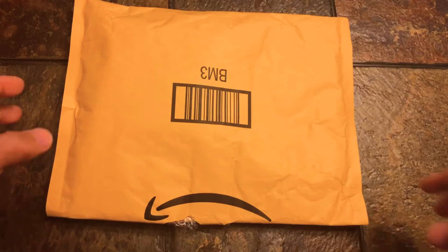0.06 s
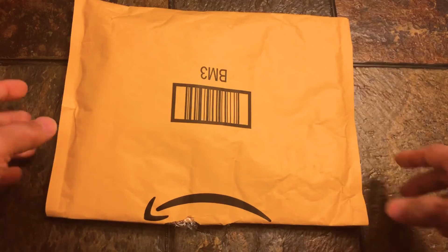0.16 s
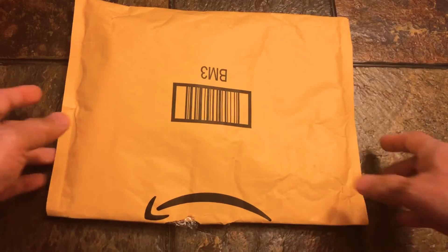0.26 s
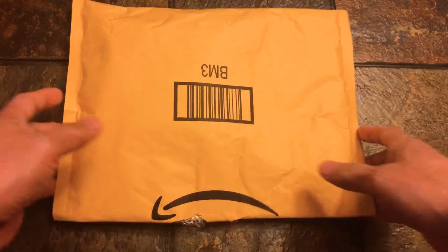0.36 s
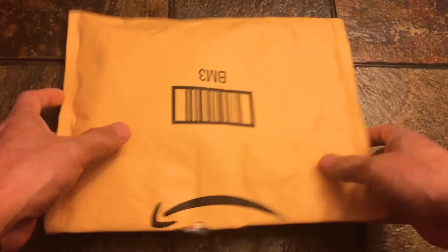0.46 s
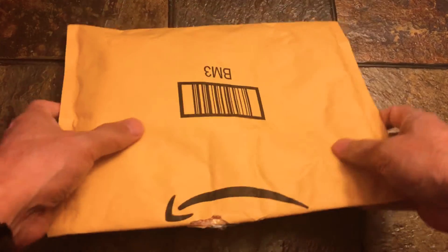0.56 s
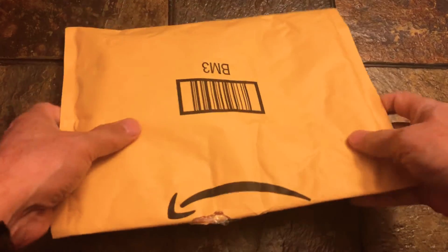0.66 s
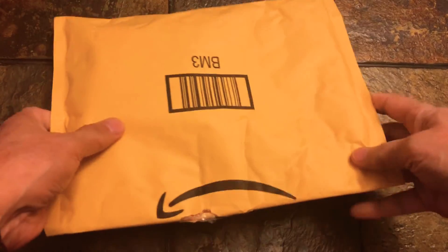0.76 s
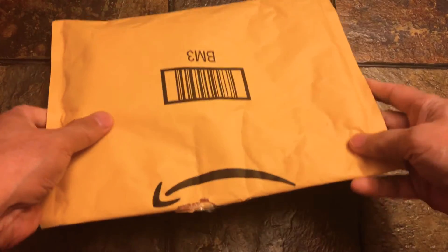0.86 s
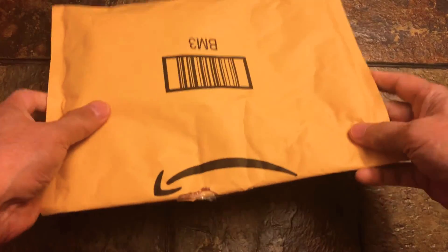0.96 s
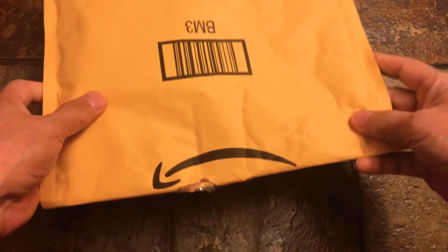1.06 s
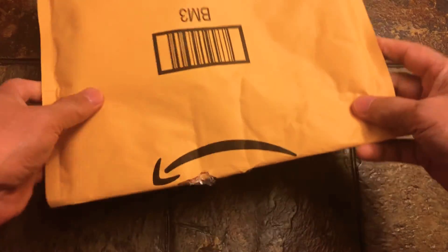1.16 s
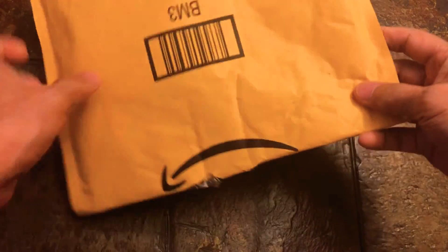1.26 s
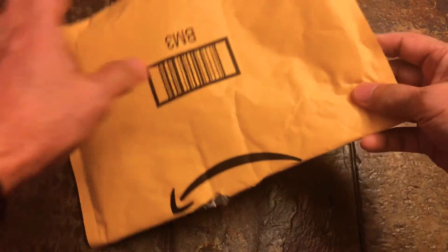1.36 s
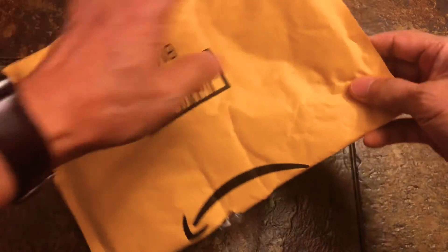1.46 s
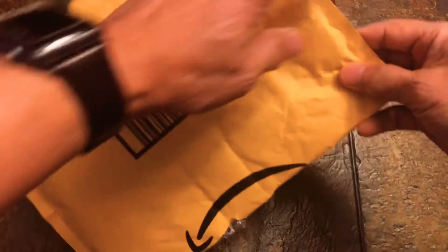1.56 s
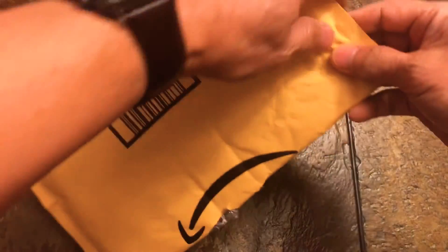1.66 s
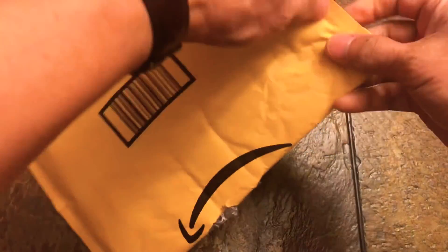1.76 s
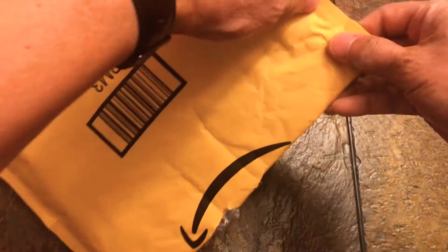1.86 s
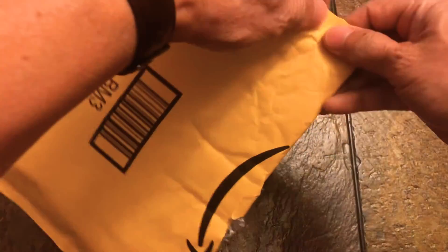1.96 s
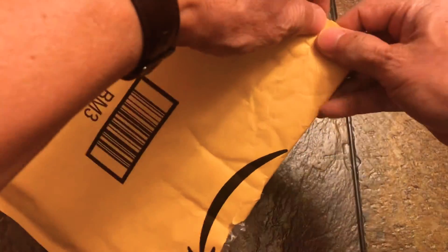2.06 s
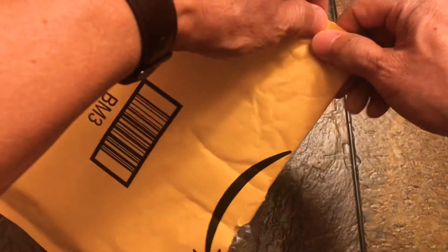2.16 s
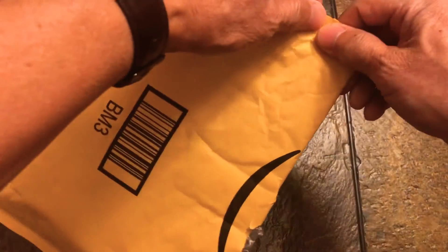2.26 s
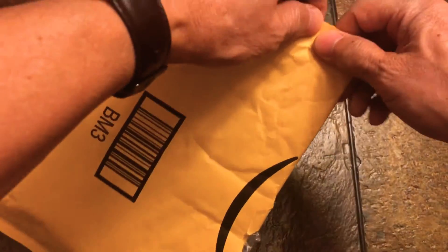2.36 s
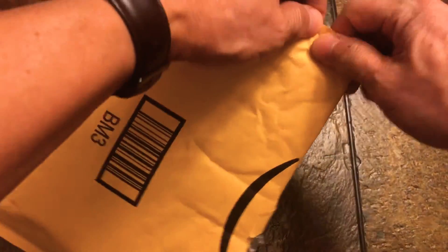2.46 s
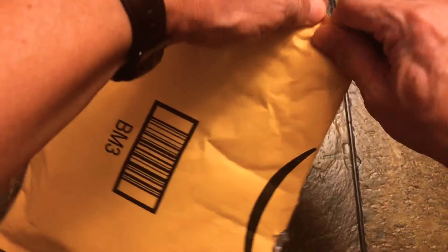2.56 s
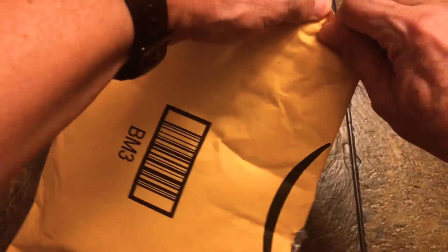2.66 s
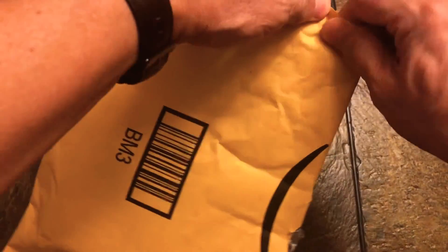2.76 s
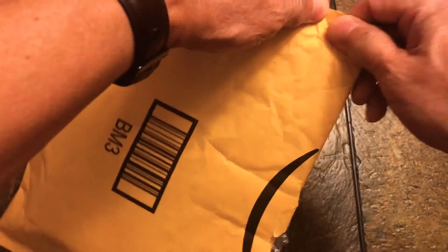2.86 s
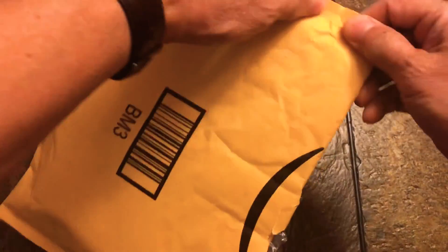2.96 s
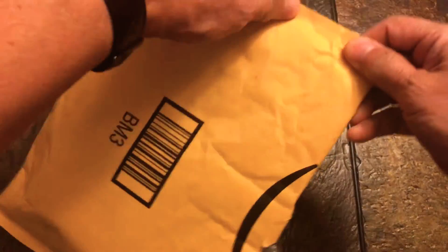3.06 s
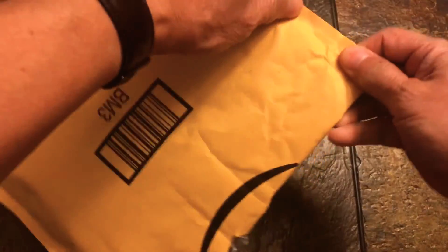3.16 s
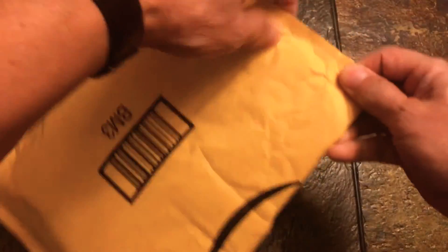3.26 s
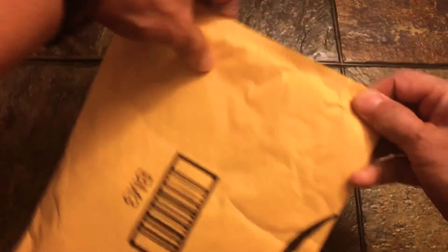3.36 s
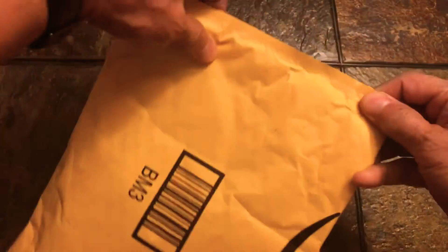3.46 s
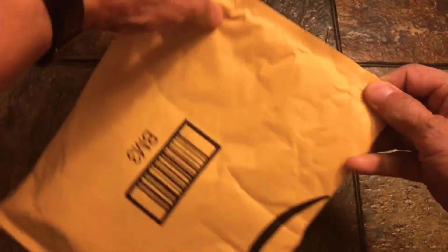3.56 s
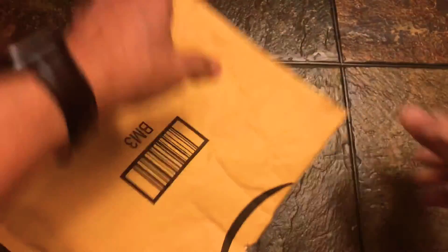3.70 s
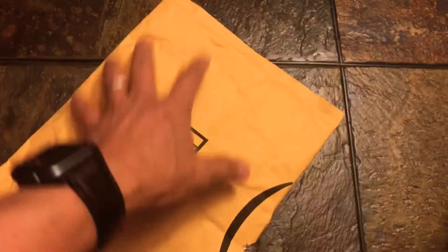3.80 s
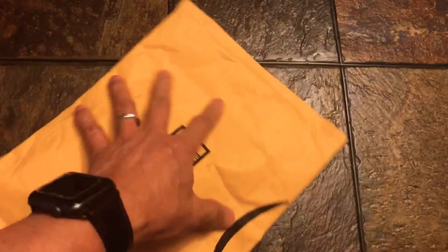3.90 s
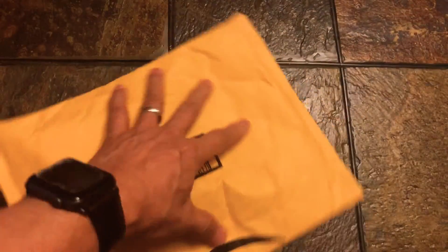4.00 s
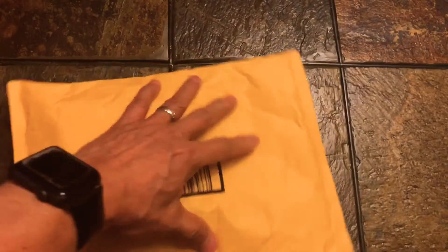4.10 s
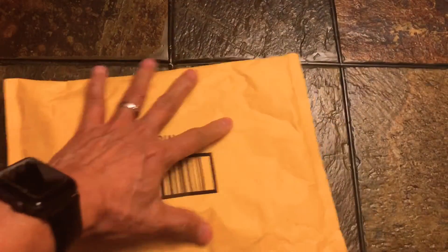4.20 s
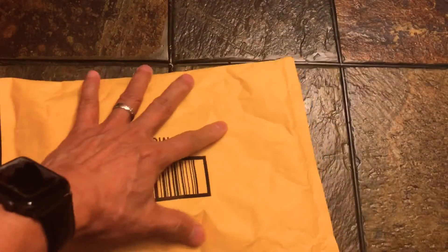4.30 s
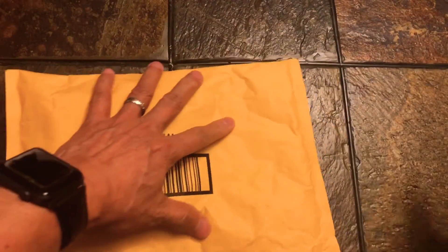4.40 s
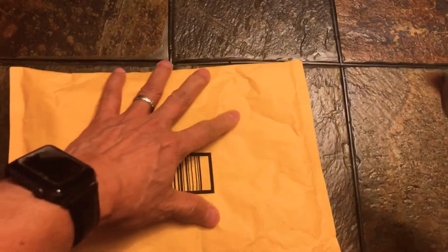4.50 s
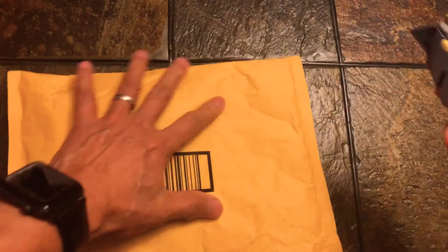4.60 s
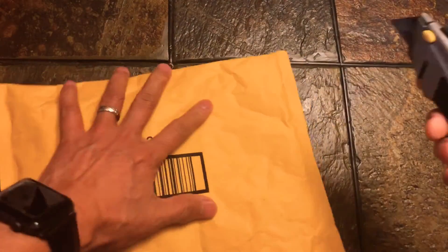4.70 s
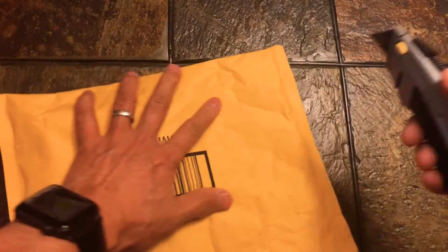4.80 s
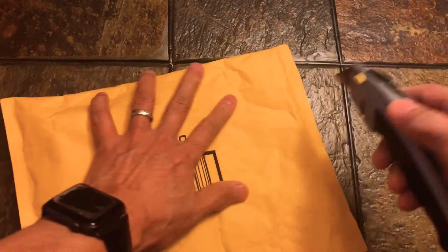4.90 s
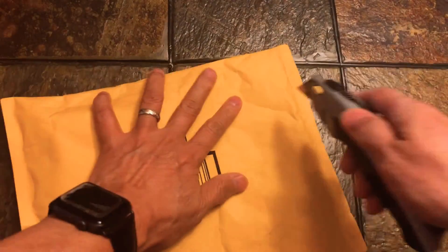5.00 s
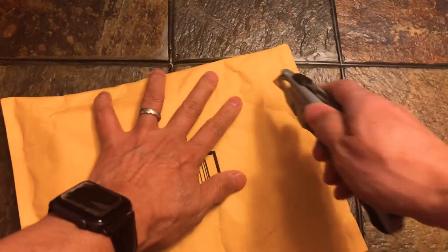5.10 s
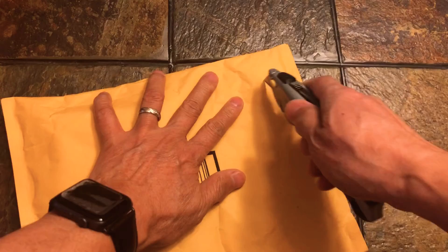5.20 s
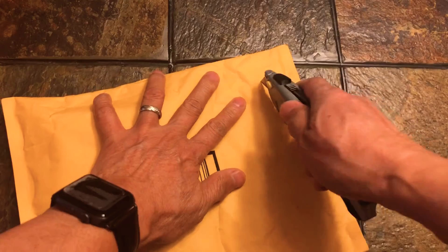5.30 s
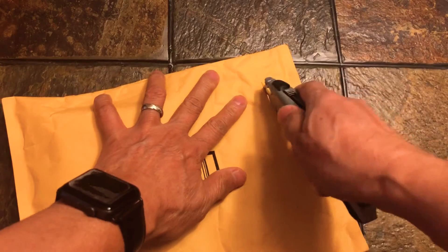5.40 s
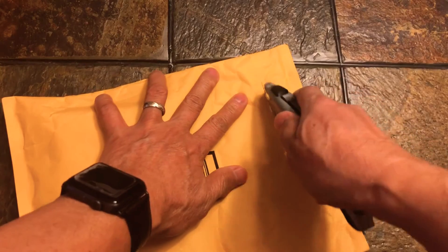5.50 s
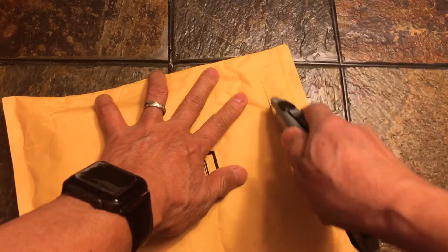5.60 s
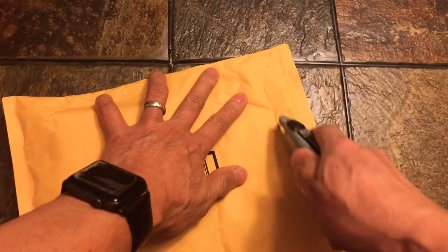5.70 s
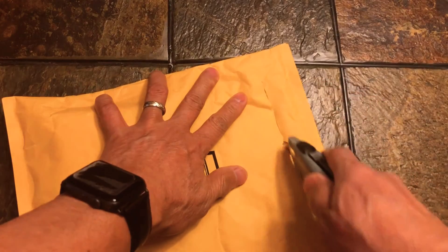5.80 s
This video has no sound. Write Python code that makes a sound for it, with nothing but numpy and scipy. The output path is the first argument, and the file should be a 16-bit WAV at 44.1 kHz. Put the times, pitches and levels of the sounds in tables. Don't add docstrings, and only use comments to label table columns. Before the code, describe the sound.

Very near the microphone in a small hard room, a padded paper envelope is gripped after a quiet start. It crinkles and crackles unevenly, with sharp crease snaps, rubbing skin and soft padding thuds as it is pulled and flattened on tiles. In the last half second a blade punches in loudly and saws, its coarse rasp breaking into quick tearing bursts.

```python
import sys
import numpy as np
from scipy import signal
from scipy.fft import rfft, irfft, next_fast_len
from scipy.io import wavfile
from scipy.ndimage import uniform_filter1d, map_coordinates

SR = 44100
rng = np.random.default_rng(int(sys.argv[2]) if len(sys.argv) > 2 else 0)


def generate_wav(signal):
    frames = np.transpose(np.atleast_2d(signal))
    scaled = np.clip(frames, -1, 1) * 32767
    pcm = np.round(scaled).astype(np.int16)
    wavfile.write(sys.argv[1], SR, pcm)


def decibels_to_gain(level_db):
    exponent = np.asarray(level_db, float) / 20
    return 10 ** exponent


N = 257984


def unit(x):
    return x / np.sqrt(np.mean(x ** 2) + 1e-20)


def along(points, hz):
    point_hz, value = np.transpose(points)
    return np.interp(np.log(hz + 1), np.log(point_hz + 1), value)


def filtered(x, response):
    size = next_fast_len(len(x) + 1280)
    hz = np.fft.rfftfreq(size, 1 / SR)
    return irfft(rfft(x, size) * response(hz), size)[:len(x)]


def resonances(*pairs):
    return lambda f: np.prod([1j * f * hz / q / (hz * hz - f * f + 1j * f * hz / q) for hz, q in pairs], axis=0)


def coloured(x, spectrum):
    closed = [(spectrum[0][0] / 2, -90)] + list(spectrum) + [(spectrum[-1][0] * 2, -90)]
    return unit(filtered(x, lambda hz: decibels_to_gain(along(closed, hz))))


def clumps(rate_hz, db):
    position = np.arange(N) * min(rate_hz, 400) / SR
    return decibels_to_gain(db * map_coordinates(rng.standard_normal(N // 100), [position]))


def spans(rows, smooth):
    t = np.arange(N) / SR
    steps = sum(value * ((t > start_s) & (t < end_s)) for start_s, end_s, value in rows)
    return uniform_filter1d(steps, size=smooth)


def add_at(out, start, wave):
    out[start:][:len(wave)] += wave


# hz, density_db (per Hz)
QUIET = [(30, -27), (71, -9.5), (140, -1), (300, -4), (450, -6.5), (700, -10.5), (4040, -30), (15500, -27)]


def hush():
    return decibels_to_gain(-66.5) * coloured(rng.standard_normal(N), QUIET)


# peak_s, crackle_db, fade_s (per 10 dB), rub_db, weight_db (both over crackle)
SUDDEN = [
    (0.398, -46.5, 0.46, -10, -0.5),
    (0.533, -42, 0.22, 0.5, -2),
    (1.27, -44, 0.24, 0, 0),
    (1.697, -56, 1.4, -3, -3),
    (3.339, -46.5, 0.15, 2, -9),
    (3.922, -40, 0.33, -2.5, 2.5),
    (5.303, -42.5, 0.22, -4.5, 2.5),
    (5.462, -35.5, 0.08, -4, 6.5),
          (.004, -54, 0.074, -12, -2.5),
    (.05, -65.5, 0.24, -13, -2),
    (5.465, -32, 0.006, -7, 2),
]
TUGS = [(.62, -43.5, 0.088, -21, 6), (.836, -45, 0.087, 0, -2.5), (.94, -47.5, 0.27, -5.5, -3),
        (1.07, -49.5, 0.035, -8, -20), (1.23, -50.5, .1, -7, -1.5), (1.481, -45, 0.24, -3, 0.5),
        (1.635, -51, 0.038, -10, 0.5), (1.73, -52, 0.046, 5.5, -3), (1.845, -43, 0.2, -0.5, -0.5),
        (2.07, -46, 0.074, -1, 2.5), (2.215, -53, 0.97, -1.5, -6), (2.601, -45.5, 0.34, -1.5, -4.5),
        (2.72, -55, 0.051, 1, 4), (2.9, -47.5, 0.28, -4.5, -17), (3.0, -48.5, 0.49, -0.5, 1),
        (3.12, -49, 0.15, 4, -4), (3.29, -59.5, 0.025, -7, 10.5), (3.39, -42.5, 0.1, 1, -1),
        (3.45, -38.5, 0.094, 1, 2.5)]
PRESSES = [(3.652, -43, 0.14, -3, -9), (3.708, -43.5, 0.033, 4.5, 9), (3.83, -49.5, 0.16, -5.5, 2.5),
           (4.15, -45, 0.23, -0.5, 1), (4.3, -50.5, 0.084, -2, 2), (4.515, -44, 0.35, -3, 0),
           (4.78, -52.5, 0.71, -3, 3), (4.909, -43.5, 0.072, 0, -1), (5.01, -50, 0.089, 1, 11),
           (5.11, -52.5, 0.13, 0.5, 6), (5.41, -52, .1, -3, -5)]
SAWING = [
    (5.61, -36.5, 0.19, -2.5, -8.5),
    (5.7, -37, 0.04, -3, -5),
    (5.767, -33.5, 0.1, -4.5, -12),
    (5.85, -30, .1, -6.5, -14.5),
]
# time_s, push_db (over sheet)
LOAD = [(0, -2.5), (.6, -10), (1.5, -6), (1.68, 1), (2.2, -13), (2.45, -10), (2.62, -6), (2.95, -3.5),
        (3.4, -0.5), (3.65, -7.5), (3.82, 2.5), (3.95, -5), (4.2, -10), (4.5, -14.5), (5.4, -12.5),
        (5.75, -0.5)]
SUDDEN_RISE_S, STROKE_RISE_S = 0.007, 0.073
RUB_SWING, SHEET_SWING, PUSH_SWING = 1.4, 1.37, 1


def effort():
    t, power = np.arange(0, N, 32) / SR, 0
    strokes = [(SUDDEN_RISE_S, *row) for row in SUDDEN]
    strokes += [(STROKE_RISE_S, *row) for row in TUGS + PRESSES + SAWING]
    for rise_s, peak_s, db, fade_s, rub_db, weight_db in strokes:
        drop_db = 10 * np.where(t < peak_s, (peak_s - t) / rise_s, (t - peak_s) / fade_s)
        push_db = weight_db + np.interp(peak_s, *np.transpose(LOAD))
        peak_db = db + np.array([0, rub_db, weight_db, push_db])[:, None]
        power = power + decibels_to_gain(peak_db - np.outer([1, RUB_SWING, SHEET_SWING, PUSH_SWING], drop_db)) ** 2
    return [np.interp(np.arange(N) / SR, t, np.sqrt(p)) for p in power]


def grains(count, hz, octaves, cycles, spread_db):
    u, t = rng.random((count, 4)), np.arange(320)[None] / SR
    pitch_hz = np.clip(hz * 2 ** (octaves * (u[:, 1:2] + u[:, 2:3] - 1)), 100, SR / 2.5)
    size = decibels_to_gain(-spread_db * np.log(u[:, 3:] + 0.014))
    wave = size * np.sin(2 * np.pi * pitch_hz * t) * np.exp(-t * pitch_hz / cycles)
    at = (u[:, :1] * N).astype(int) + np.arange(320)
    return unit(np.bincount(at.ravel(), wave.ravel(), minlength=N)[:N])


def bed(spectrum, spikes, share, gain, patchy_db):
    share = np.clip(share, 0, 1)
    mix = np.sqrt(1 - share) * rng.standard_normal(N) + np.sqrt(share) * spikes
    z = signal.stft(mix * gain, nperseg=512)[2]
    field = uniform_filter1d(rng.standard_normal(z.shape), size=5, axis=0)
    field = uniform_filter1d(field, size=8, axis=1)
    patchy = signal.istft(z * decibels_to_gain(patchy_db * unit(field)), nperseg=512)[1][:N]
    return coloured(patchy, spectrum)


# hz, density_db (per Hz)
CRACKLE = [(1200, -5.5), (2200, -6), (3300, 0), (5000, 0), (8000, -6.5)]
# hz, density_db (per Hz)
RUB = [(3000, -17), (6000, 0), (8500, -1.5), (11000, -5), (15500, -6.5)]
# hz, density_db (per Hz)
SHEET = [(500, 1), (760, -2), (920, -1.5), (1150, -4), (1600, 2.5), (2000, 0), (3200, -20)]
# hz, density_db (per Hz)
PUSH = [(25, -30), (50, 0.5), (85, -2), (190, -4.5), (400, 2), (600, -3), (1000, 7)]
# hz, density_db (per Hz)
RASP = [(900, -26), (1600, 3), (2300, 4), (3300, 3), (4800, 6), (6000, -13), (8500, -1)]
# start_s, end_s, rub_db
LULLS = [
    (1.138, 1.198, -3.5),
    (1.66, 1.688, -9),
    (2.39, 2.51, -5.5),
    (2.8, 2.85, -8),
    (3.285, 3.335, -3),
    (3.745, 3.81, -0.5),
    (3.85, 3.912, -2),
    (4.35, 4.42, -2.5),
    (5.23, 5.272, -4),
]
BLADE_S = 5.456


def handling():
    crackle, rub, sheet, push = effort()
    lull_db = spans(LULLS, smooth=200)
    crackle, rub = crackle * decibels_to_gain(0.56 * lull_db), rub * decibels_to_gain(lull_db)
    fine = grains(count=7000, hz=3170, octaves=1.39, cycles=1.6, spread_db=-1.5)
    flex = grains(count=2500, hz=1320, octaves=1.0, cycles=3.0, spread_db=4.0)
    coarse = grains(count=700, hz=299, octaves=1.55, cycles=2.0, spread_db=2)
    tips = grains(count=9000, hz=9800, octaves=0.53, cycles=1.0, spread_db=2.0)
    fibres = grains(count=12000, hz=2560, octaves=1.2, cycles=2.6, spread_db=4.0)
    wrinkles = grains(count=900, hz=2800, octaves=1.6, cycles=1.4, spread_db=5)
    pricks = grains(count=600, hz=5500, octaves=1, cycles=.6, spread_db=5)
    tremor = clumps(60, db=.9) * clumps(170, db=1.3)
    rasp = decibels_to_gain(1.5) * bed(RASP, fibres, 0.87, tremor * clumps(220, db=1.0), patchy_db=4.5)
    paper = decibels_to_gain(-0.24) * bed(CRACKLE, fine, 0.27, tremor, patchy_db=0.5)
    paper = paper + decibels_to_gain(-11) * wrinkles + decibels_to_gain(-8) * pricks
    skin = decibels_to_gain(1.0) * bed(RUB, tips, 0.24, tremor, patchy_db=1.0)
    flexing = bed(SHEET, flex, 0.29, tremor, patchy_db=3.5)
    padding = decibels_to_gain(-1.0) * bed(PUSH, coarse, 0.034, np.sqrt(tremor), patchy_db=0.5)
    surface = np.where(np.arange(N) / SR > BLADE_S, rasp, paper)
    return crackle * surface + rub * skin + sheet * flexing + push * padding


LEAD = 128
SPREAD = .023
KNOCK_DB, KNOCK_GROWS, KNOCK_DB_PER_OCTAVE = -27, 0.59, -4.5


def snap(db, hz, edge_db, knock_db):
    t = np.arange(768) / SR
    scatter = np.clip(rng.standard_normal(len(t)) ** 3 / 4, -1.6, 1.6)
    jerk = decibels_to_gain(-19.0 - 60 * t / 0.013) * scatter
    jerk[0] = np.clip(0.97 + db / 35, .25, 1)

    def dispersion(f):
        return np.exp(-2j * np.pi * (SPREAD * (2 * np.sqrt(f) - f / np.sqrt(hz)) + f * LEAD / SR))

    def body_response(f):
        damping = 1 / (1 - (f / hz / 2.4) ** 2 + .5j * f / hz)
        return damping * resonances((hz * 1.2, .8), (hz * 0.92, .55), (hz * 0.95, .9))(f)

    jerk = filtered(jerk, dispersion)
    body = filtered(jerk, body_response)
    edge = filtered(jerk, resonances((6800 * 2 ** (edge_db / 30), .9), (4200, .6)))
    knock = filtered(jerk, resonances((560, 1.2), (420, .9), (500, .6)))
    parts = [(body, 0), (edge, edge_db), (knock, knock_db)]
    return sum(decibels_to_gain(db + part_db - 0.5) * p / np.abs(p).max() for p, part_db in parts)


# start_s, peak_db, pitch_hz, edge_db (over body)
LIFTING = [(0.529, -21, 6030, -34), (0.5293, -15.5, 2000, -32), (0.6269, -17.5, 1670, -4),
           (0.647, -21.5, 1770, -0.5), (0.786, -19, 1730, -12), (0.8187, -20, 2640, -4.5),
           (0.8198, -20, 5200, -12), (0.8209, -13, 1840, -33), (0.8596, -24.5, 1560, -4),
           (0.9637, -19, 1560, -29), (1.409, -27, 1290, 4), (1.4327, -15, 1590, -5.5),
           (1.468, -0.5, 2660, -17), (1.8382, -20.5, 4950, -9), (1.908, -23, 1620, -22),
           (1.9301, -27, 394, -25), (2.0633, -20.5, 1750, -15), (2.178, -25.5, 2220, -20),
           (2.1972, -1.7, 3740, -7), (2.1966, -2.5, 5500, -18), (2.201, -9.5, 5560, -15),
           (2.2001, -16, 2140, -30)]
PULLING = [(2.548, -21.5, 1420, -21), (2.554, -18.5, 3700, -32), (2.5808, -9.5, 3520, -33),
           (2.5817, -14, 2290, -35), (2.609, -24, 1400, 5), (2.6168, -22, 1390, -27),
           (2.646, -24.5, 5050, -17), (2.6609, -20.5, 1530, -4), (2.702, -19, 3220, -5),
           (2.7914, -19.5, 1750, -42), (2.856, -32, 1740, -19), (2.9428, -20, 1600, -16),
           (2.9678, -3.5, 3220, -21), (3.1217, -16, 1960, 7.5), (3.275, -19.5, 2530, 0.5),
           (3.3825, -14, 1740, -4), (3.4008, -15.5, 3980, -11), (3.499, -17, 1970, -8),
           (3.533, -21.5, 1610, -8)]
FLATTENING = [(3.6574, -18, 4040, -11), (3.719, -17, 1260, -2), (3.7217, -16, 3160, -4),
              (3.8258, -29.5, 1540, 10), (3.83, -21, 1050, -9), (3.915, -23, 1390, -15),
              (3.9358, -12.5, 3400, -7), (3.949, -12, 2250, -2), (3.959, -15, 1164, -3),
              (4.023, -25, 1210, -21), (4.101, -27.5, 1240, -17), (4.2593, -20.5, 4600, 5.5),
              (4.3116, -11, 1410, -15.5), (4.3202, -16, 1320, -11), (4.516, -21.5, 835, -1),
              (4.55, -23, 1580, -17), (4.553, -30, 1000, 2), (4.601, -13, 2500, 4.5),
              (4.6034, -21, 980, -30), (4.6203, -23.5, 1750, -22), (4.7378, -20.5, 1410, -32),
              (4.787, -19, 1320, -10), (4.8072, -24, 1340, -22), (4.904, -21, 1360, -24),
              (4.926, -27, 3000, -12), (4.987, -13, 1090, -3.5), (5.0482, -6.5, 2000, -6.5),
              (5.0505, -16.5, 1220, -29), (5.085, -19.5, 2830, -28), (5.1289, -15.5, 980, -17)]
CUTTING = [(5.2753, -17, 1230, -43), (5.2805, -18, 1200, -0.5), (5.3177, -16.5, 1930, -30),
           (5.3311, -12, 2040, -4.5), (5.4125, -16, 1750, -11), (5.4553, -8, 1680, -37),
           (5.4557, -1, 3740, -26), (5.456, -1, 1310, -20), (5.4582, -10.5, 2080, -3),
           (5.4661, -7.5, 3240, -3), (5.532, -5.5, 2100, -2.5), (5.535, -24, 1840, -15),
           (5.547, -9.5, 3470, -31), (5.5964, -2, 3060, 1.5), (5.616, -18, 2270, -12),
           (5.6589, -10.5, 2970, -2.5), (5.6774, -20, 2600, 0), (5.7454, -25, 2280, 8),
           (5.826, -14, 2420, 0), (5.8335, -19, 2200, -3)]
# start_s, peak_db, pitch_hz
TICKS = [(0.403, -29, 960), (0.778, -28, 750), (0.939, -29.5, 694), (1.052, -38, 880),
         (1.09, -35, 675), (1.2777, -24.5, 1800), (1.45, -27, 1320), (1.647, -30.5, 935),
         (1.7214, -24.5, 1270), (1.7273, -27, 1490), (1.871, -22.5, 970), (1.9705, -31, 660),
         (2.104, -27.5, 1740), (2.287, -34, 1520), (2.6944, -24, 1300), (2.808, -30.5, 674),
         (2.995, -29, 1480), (3.113, -29, 820), (3.2064, -24.5, 1410), (3.2513, -31, 1680),
         (3.5098, -18, 1370), (3.599, -28, 1340), (4.24, -25, 1660), (4.648, -34, 1840),
         (4.8877, -24, 990), (4.959, -26, 1360), (4.9946, -22, 1390), (5.1137, -26, 1390),
         (5.707, -35, 990),
         (.159, -57, 7000), (0.302, -51.5, 3870), (0.421, -46, 4260), (0.445, -25.5, 3850),
                (0.465, -27, 5860), (0.4906, -23.5, 3980), (.6065, -16, 8270), (0.711, -26, 6700),
                (0.852, -28, 3340), (1.2726, -28.5, 3100), (1.2937, -31, 8650), (1.8678, -27, 6940),
                (1.8835, -27, 4520), (2.1877, -19, 8140), (2.2128, -35, 7040), (2.385, -33, 7990),
                (2.5134, -34, 7900), (2.72, -25, 6650), (3.224, -24, 3450), (3.418, -21, 2930),
                (3.449, -16, 6750), (3.454, -21, 2820), (4.236, -27, 3810), (4.4298, -29.5, 4630),
                (4.8292, -32, 8760), (5.136, -29.5, 6360), (5.206, -33, 7300), (5.484, -20, 5870),
                (5.488, -18, 5850), (5.5243, -25, 8480),
         (.733, -41, 3170), (.9928, -40, 3610), (1.0315, -33, 6000), (1.066, -42, 8000),
               (1.089, -35, 6000), (1.105, -42.5, 2190), (1.124, -42, 7000), (1.133, -43, 7080),
               (1.2163, -47, 4300), (1.527, -43, 11000), (1.655, -31.5, 3230), (1.781, -42, 7950),
               (1.9273, -29, 4000), (1.9356, -25.5, 3400), (2.027, -38, 2500), (2.055, -28, 5000),
               (2.675, -27, 7000), (2.711, -25, 11100), (2.545, -31, 6500), (2.766, -36, 8940),
               (2.782, -43, 10000), (2.815, -41, 6460), (2.95, -31, 7000), (3.007, -44, 10000),
               (4.209, -28.5, 2500), (4.471, -29, 10000), (4.821, -31, 780), (5.195, -58, 9150),
               (5.2245, -39, 5140), (5.268, -40, 5000), (5.321, -35, 10100)]


def snaps():
    out = np.zeros(N + SR)
    events = [(*row, True) for row in LIFTING + PULLING + FLATTENING + CUTTING]
    events += [(*row, -40, row[2] < 2000) for row in TICKS]
    for start_s, db, hz, edge_db, knocks in events:
        knock_db = -40
        if knocks:
            knock_db = KNOCK_DB + (KNOCK_GROWS - 1) * db + KNOCK_DB_PER_OCTAVE * np.log2(hz / 2000)
        add_at(out, round(start_s * SR) - LEAD, snap(db, hz, edge_db, knock_db))
    return out[:N]


# hz, t60_s
ROOM = [(200, 0.97), (2000, 0.9), (10000, 0.13)]


def room(x):
    hz, t, z = signal.stft(rng.standard_normal(SR // 2), SR, nperseg=256)
    tail = signal.istft(z * decibels_to_gain(-60 * t / along(ROOM, hz)[:, None]), SR, nperseg=256)[1]
    delayed = np.pad(x, (200, 0))
    return signal.fftconvolve(delayed, tail / np.linalg.norm(tail))[:N]


# start_s, level_db, pitch_hz, t60_ms
RINGS = [
    (.5289, -4, 5050, 5.5),
    (0.5277, -10.5, 6700, 6.5),
    (2.1976, -20, 3420, 23),
    (2.5808, -14, 5620, 7.5),
    (2.5819, -15.5, 3550, 10),
]


def rings():
    out, t = np.zeros(N + SR), np.arange(768) / SR
    rise = 1 - np.exp(-t / 0.00029)
    for start_s, db, hz, t60_ms in RINGS:
        decay = decibels_to_gain(db - 60 * t / (t60_ms / 1000))
        add_at(out, round(start_s * SR), decay * rise * np.sin(2 * np.pi * hz * t))
    return out[:N]


# start_s, peak_db, pitch_hz
THUDS = [(1.65, -38, 257), (1.94, -46, 160), (1.875, -44, 440), (0.6, -29.5, 410), (2.088, -41.5, 210),
         (2.551, -46, 185), (2.596, -31.5, 410), (2.599, -37, 180), (2.613, -32, 170), (2.624, -37, 100),
         (3.291, -35.5, 68), (1.302, -31.5, 680), (0.55, -43, 190), (5.2, -34, 190), (3.732, -32.5, 69),
         (3.823, -31, 170), (3.94, -29.5, 460), (3.984, -30.5, 210), (4.124, -36, 206), (4.33, -42, 196),
         (4.505, -36.5, 220), (5.457, -28, 420), (5.74, -38, 270), (5.747, -32.5, 274), (5.76, -28.5, 210),
         (3.213, -31.5, 490), (3.44, -33.5, 280)]
SAG_PER_S = 3


def thuds():
    out, t = np.zeros(N + SR), np.arange(SR // 8) / SR
    swell = t / 0.0078 * np.exp(1 - t / 0.0071)
    for start_s, db, hz in THUDS:
        lump = unit(filtered(rng.standard_normal(len(t)), resonances((hz, .9), (hz, .7))))
        push = .55 * np.sin(2 * np.pi * hz * t * (1 - SAG_PER_S * t))
        add_at(out, round(start_s * SR), decibels_to_gain(db - 6.5) * swell * (push + lump))
    return out[:N]


# peak_s, peak_db, pitch_hz, length_ms
CRUMBLES = [(0.553, -28, 1600, 14), (.5805, -29.5, 920, 3.8), (0.599, -17.5, 3900, 3.2),
            (.625, -30, 2620, 4.5), (1.633, -32, 1440, 6), (1.828, -32.5, 1270, 4.1),
            (1.842, -33, 1210, 4.3), (1.884, -29, 1100, 2.5), (2.09, -33.5, 4500, 9.5),
            (2.588, -24, 1180, 2.1), (2.6955, -33.5, 513, 6.6), (3.179, -35, 1350, 4.4),
            (3.229, -27.5, 1460, 3.4), (3.258, -33, 1670, 4.2), (3.275, -21, 1690, 3.4),
            (3.311, -34, 1490, 3), (3.461, -27.5, 1500, 5.7), (3.546, -26.5, 1270, 1.3),
            (3.641, -28, 1050, 5), (3.7, -30.5, 990, 5), (3.826, -31, 2600, 9.5), (3.922, -35, 1370, 3.5),
            (3.953, -22, 1200, 5), (3.988, -33, 1300, 4.2), (4.132, -32, 2500, 14),
            (4.249, -25.5, 1500, 3.8), (4.346, -29, 1800, 3), (4.505, -28, 2630, 2.9),
            (5.144, -35, 900, 2.3), (5.306, -33, 13500, 5.4), (5.313, -26, 8900, 5.1),
            (5.376, -34, 9000, 5), (5.436, -31, 5060, 3.1), (5.466, -6.5, 2900, 7.6)]
TEARS = [(5.641, -27, 1760, 6), (5.699, -22, 2440, 3), (5.7067, -18, 1970, 4.8), (5.715, -20, 2600, 5.1),
         (5.7452, -16, 2420, 5.8), (5.752, -15, 2030, 4.5), (5.759, -21, 2170, 3.6), (5.766, -26, 2500, 3),
         (5.771, -17, 2400, 5.4), (5.778, -19.5, 2210, 4.6), (5.793, -32, 2300, 5), (5.803, -25, 2100, 2),
         (5.808, -22, 2900, 5.7), (5.815, -20, 2400, 3), (5.8262, -13, 2410, 3.8), (5.8342, -18, 2150, 3.5),
         (5.836, -21, 2500, 2), (5.843, -33, 2320, 4.6)]


def crumbles():
    out, t = np.zeros(N + SR), np.arange(-512, 1024) / SR
    for peak_s, db, hz, length_ms in CRUMBLES + TEARS:
        shower = rng.standard_normal(len(t)) * decibels_to_gain(4.2 * rng.standard_normal(len(t)))
        swell = decibels_to_gain(-12 * np.where(t < 0, -t * 1.3, t) / (length_ms / 1000))
        if hz < 12000:
            colour = resonances((hz * 1.16, 1.2), (hz * 0.79, 1.2))
        else:
            colour = resonances((hz, 9), (hz, 5))
        burst = filtered(shower * swell, colour)
        add_at(out, round(peak_s * SR) - 512, decibels_to_gain(db) * burst / np.abs(burst).max())
    return out[:N]


# start_s, end_s, level_db
SLIDES = [
    (3.372, 3.54, -58),
    (3.97, 4.235, -55),
    (4.49, 4.604, -59.5),
]


def drag():
    noise = rng.standard_normal(N)
    hum = unit(filtered(noise, resonances((194, 4), (194, 1.5))))
    rumble = 0.49 * unit(filtered(noise, resonances((110, .8), (330, .8))))
    gain = spans([(start_s, end_s, decibels_to_gain(db)) for start_s, end_s, db in SLIDES], smooth=2600)
    return (hum + rumble) * clumps(25, db=1.0) * gain


def hollow(f):
    return 1 - .36 * resonances((720, 3))(f)


def scene():
    quiet = hush()
    hands = handling()
    cracks = snaps() + crumbles() + rings()
    echo = decibels_to_gain(-21) * room(cracks)
    return (filtered(cracks + echo + hands, hollow) + thuds() + drag() + quiet)[None]


def top_cut(x):
    return signal.sosfilt(signal.butter(12, 16970, fs=SR, output="sos"), x)


TOP_HZ, BURST_HZ = 15850, 16900


def record(dry):
    x = filtered(dry[0], lambda hz: 1 - np.exp(-(hz / 45) ** 4))
    x = x / (1 + np.abs(x / .99) ** 12) ** (1 / 12)
    low = filtered(x, lambda hz: hz < TOP_HZ)
    top = filtered(x, lambda hz: (hz >= TOP_HZ) & (hz < BURST_HZ))
    sharp = uniform_filter1d((np.abs(x) > .22) * 1., size=128) > 0
    opening = uniform_filter1d(sharp * 1., size=128)
    return top_cut((low + 0.17 * top * opening)[None])


dry = scene()
out = record(dry)
generate_wav(out)
```